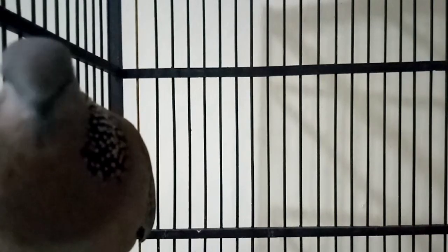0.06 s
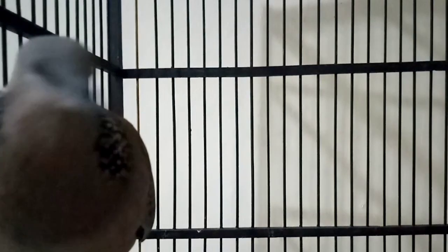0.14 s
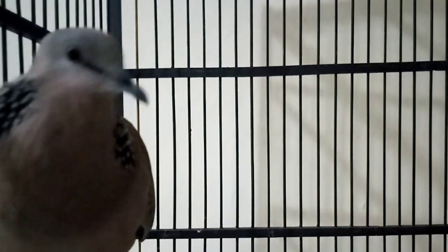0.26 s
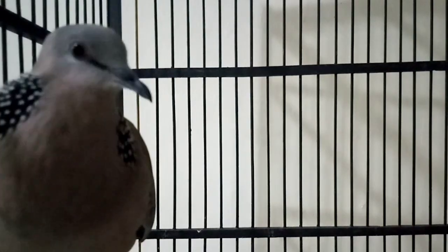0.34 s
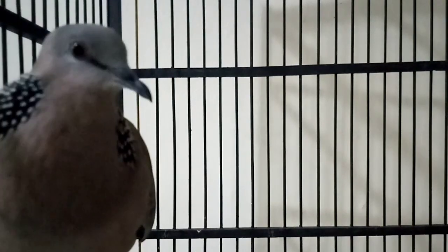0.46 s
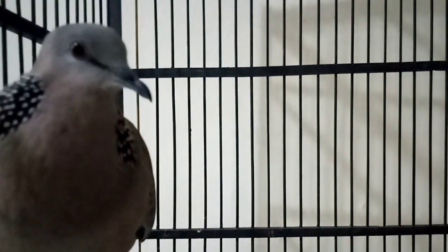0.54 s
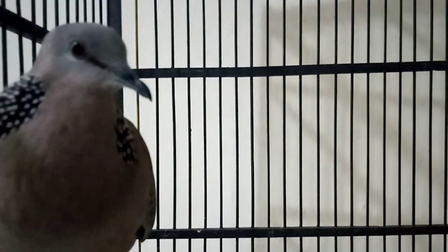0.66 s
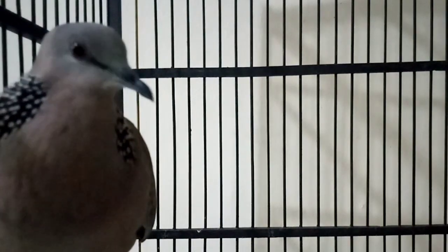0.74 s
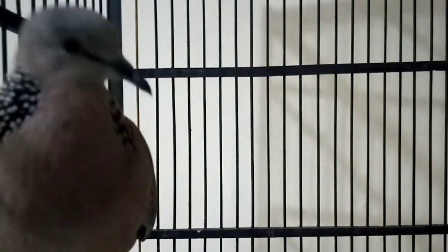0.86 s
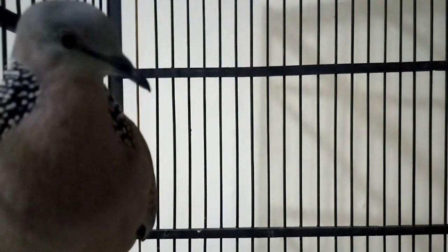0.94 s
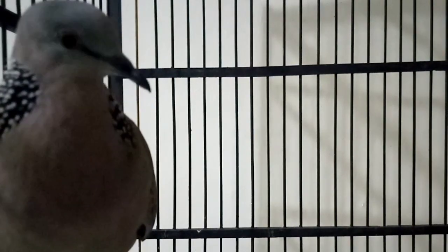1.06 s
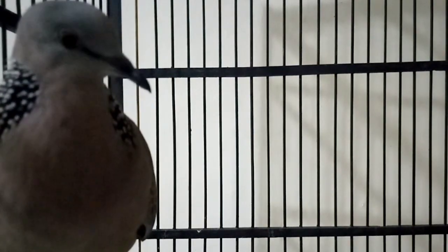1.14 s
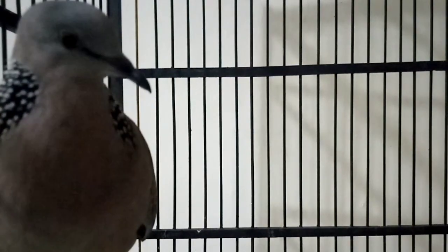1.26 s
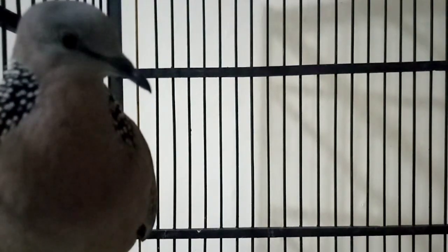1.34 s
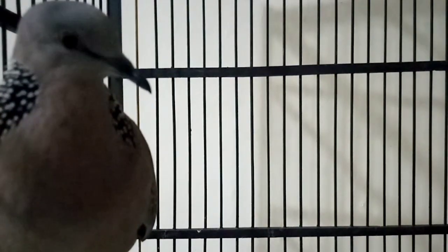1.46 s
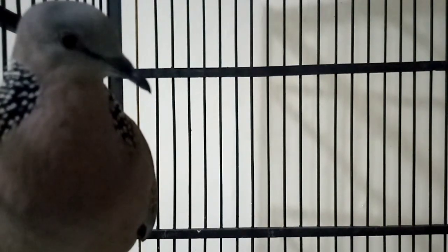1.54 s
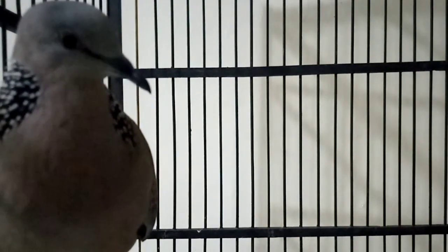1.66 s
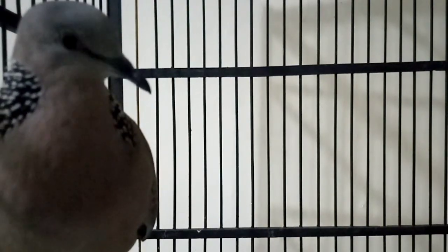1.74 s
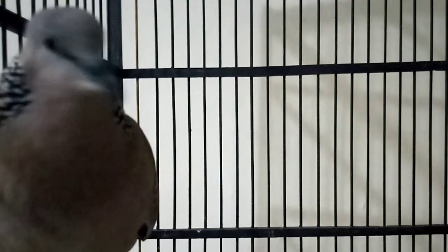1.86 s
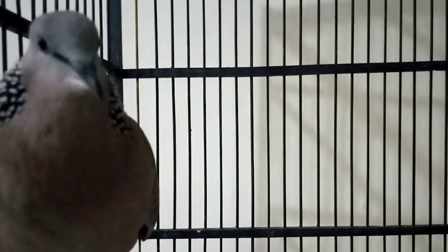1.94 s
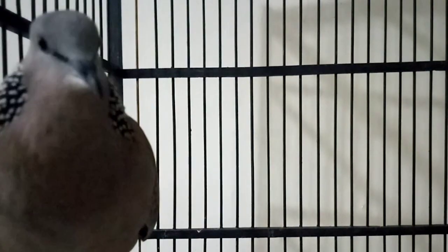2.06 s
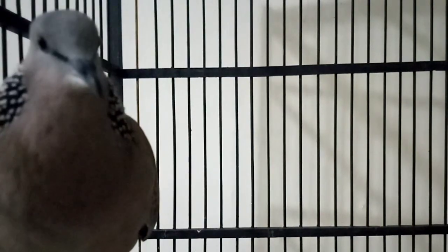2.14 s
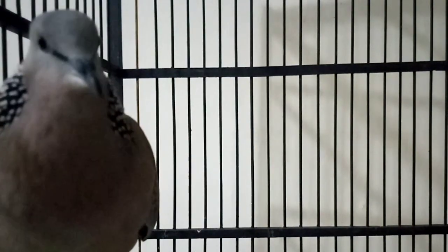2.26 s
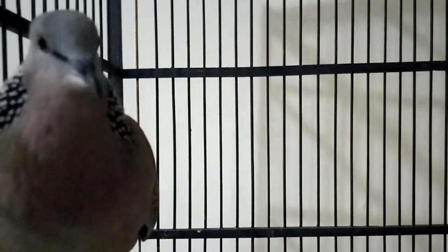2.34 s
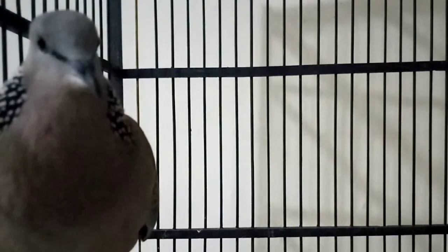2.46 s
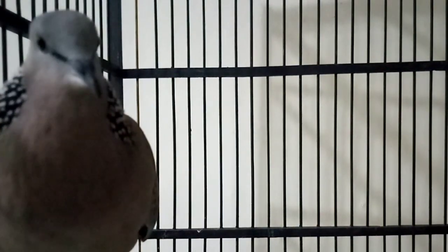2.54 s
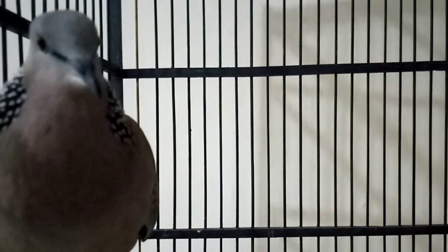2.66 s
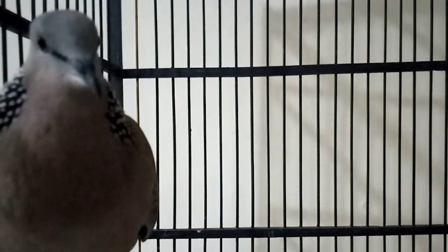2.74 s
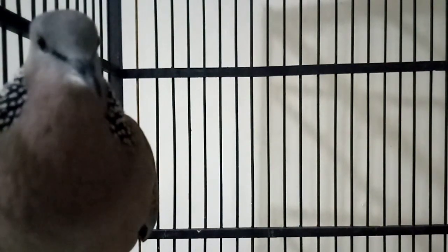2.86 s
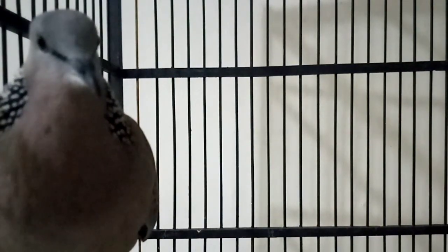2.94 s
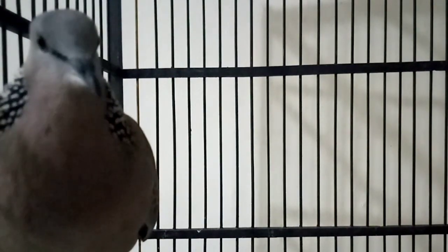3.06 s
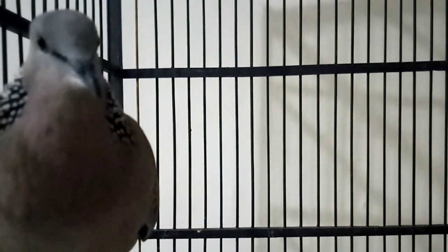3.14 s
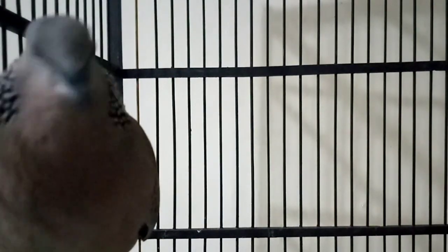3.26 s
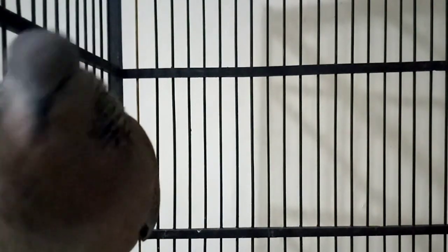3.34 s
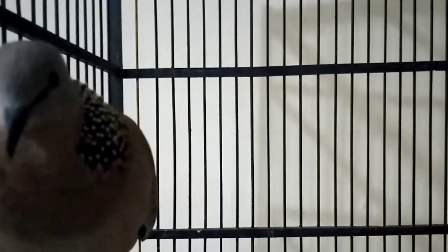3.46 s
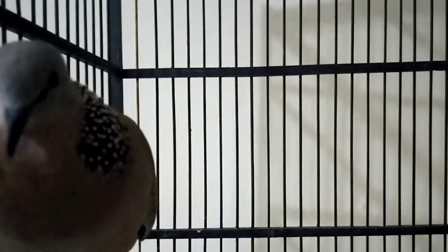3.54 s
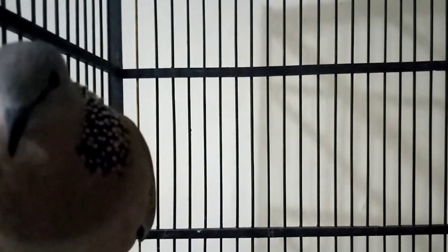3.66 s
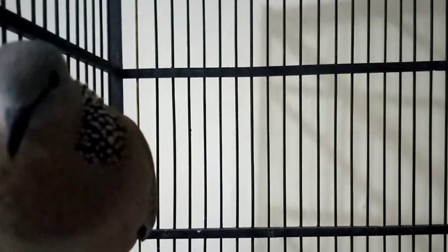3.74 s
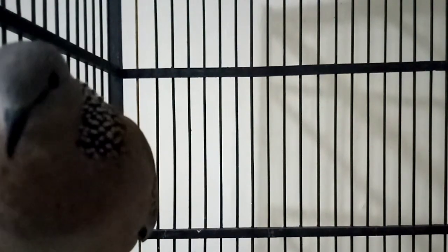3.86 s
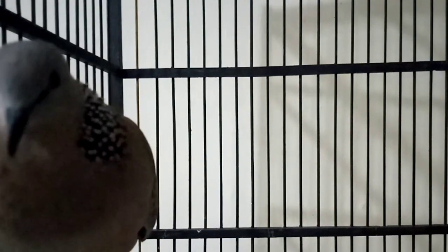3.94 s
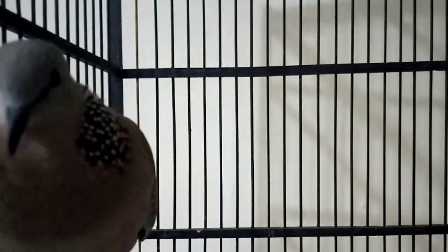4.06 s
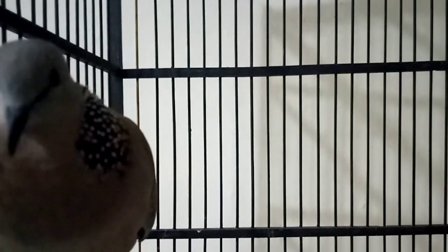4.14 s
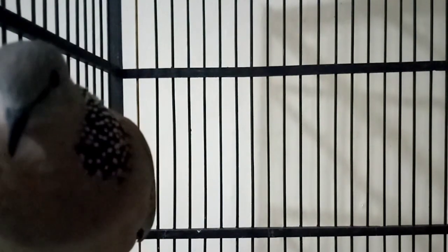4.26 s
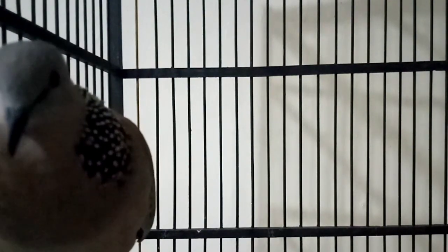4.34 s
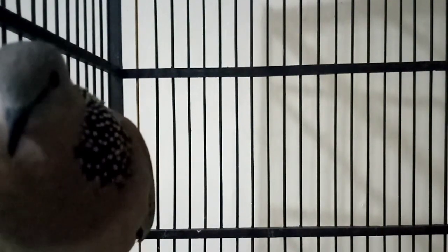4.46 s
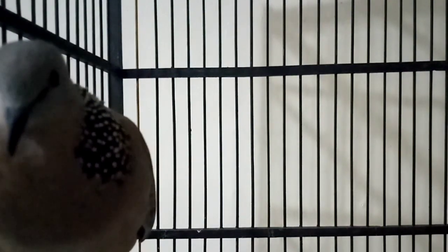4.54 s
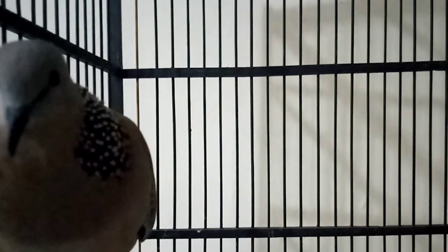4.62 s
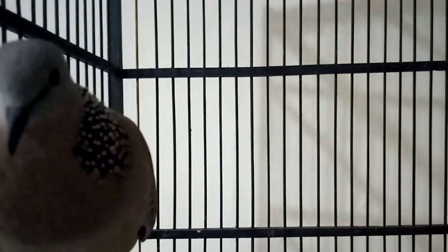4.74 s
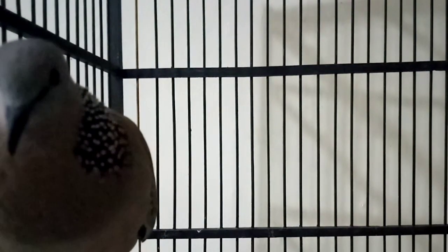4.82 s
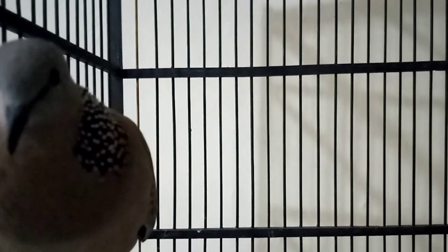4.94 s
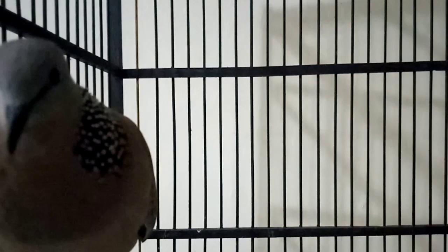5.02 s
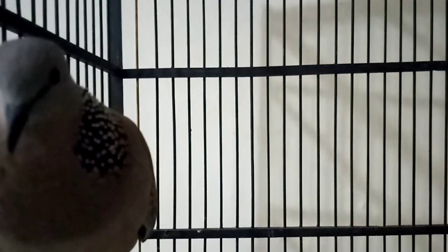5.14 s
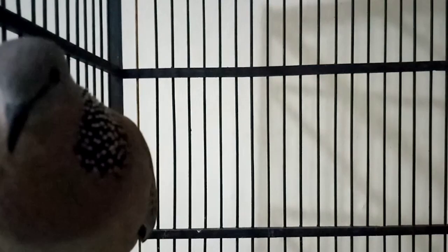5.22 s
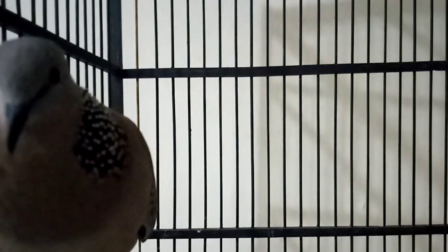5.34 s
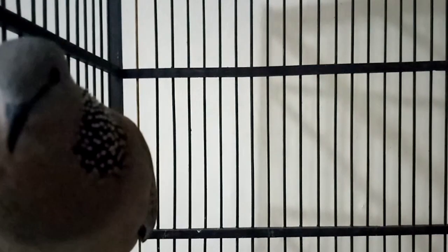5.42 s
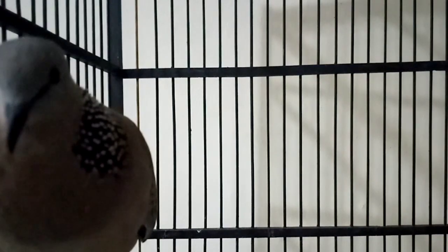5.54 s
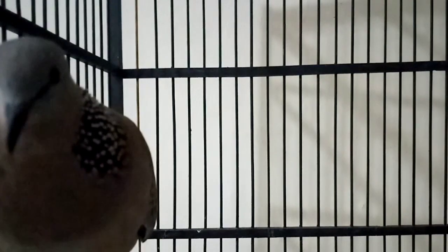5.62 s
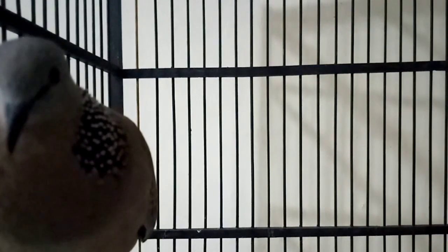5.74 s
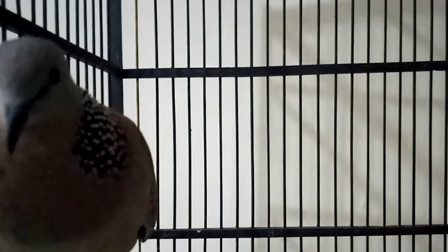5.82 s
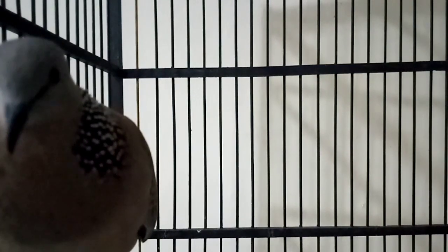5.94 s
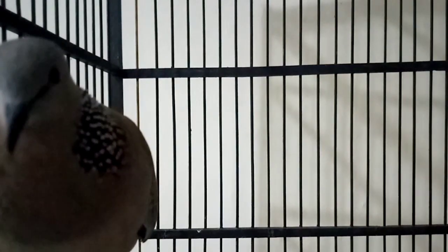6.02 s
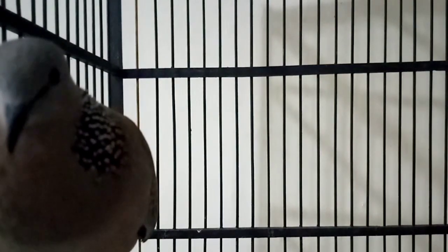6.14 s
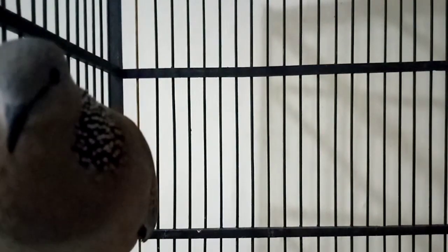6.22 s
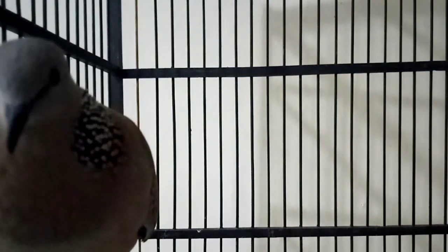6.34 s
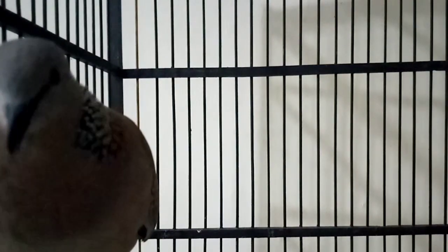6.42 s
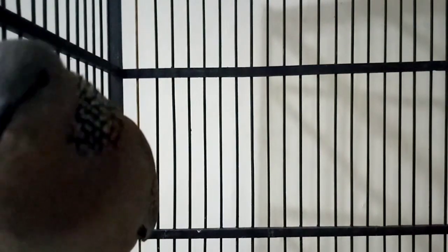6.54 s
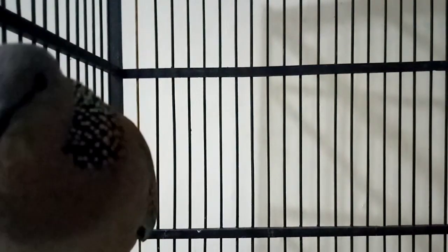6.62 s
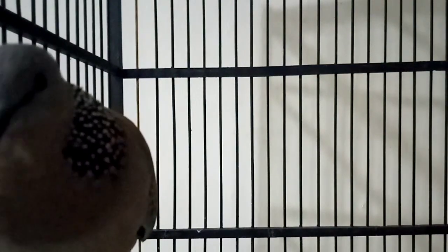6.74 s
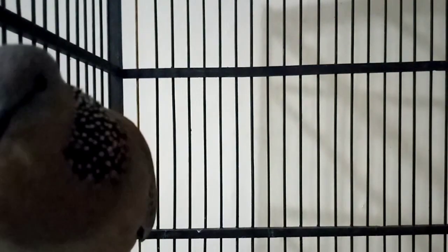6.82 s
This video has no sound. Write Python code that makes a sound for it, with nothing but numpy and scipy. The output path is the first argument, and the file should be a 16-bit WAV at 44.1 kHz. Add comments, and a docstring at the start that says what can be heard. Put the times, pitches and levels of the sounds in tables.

```python
"""A thin high whine trembles over quiet room noise, faint hums and a flickering sizzle, and falters early on.
Far birds call faintly as arching, lightly rolled tones. After soft puffs, a caged spotted dove coos close by:
a short arch, a rising note, then a long rolled note that smooths out as it falls, with faint high ticks.
The coos are near-pure tones with rough octave and buzz; they ring in a small bare room.
A hiss and more far calls follow; at the end the arch, the rise and soft puffs come again."""
import sys
import numpy as np
from scipy import signal
from scipy.fft import rfft, irfft
from scipy.io import wavfile
from scipy.ndimage import uniform_filter1d, minimum_filter1d

SR = 44100
rng = np.random.default_rng(int(sys.argv[2]) if len(sys.argv) > 2 else 0)


def wrap_up_sound(samples):
    """Save the sound to the file named by the first command line argument, as 16-bit audio."""
    columns = np.atleast_2d(samples).T
    # keep every value between -1 and 1, then stretch to whole-number steps
    tamed = np.clip(columns, -1, 1)
    steps = np.round(tamed * 32767).astype(np.int16)
    wavfile.write(sys.argv[1], SR, steps)


N = 303408
TIME_S = np.arange(N) / SR
BINS_HZ = np.fft.rfftfreq(N, 1 / SR)

# background noise spectrum: freq_hz, relative_db_per_hz
FLOOR_SPECTRUM = [(25, -16), (50, -7.5), (100, 1), (135, -3.5), (200, -2), (330, -4), (500, -1), (800, -4),
                  (1400, -16.5), (2600, -17.5), (4200, -20.5), (5100, -25), (6800, -26.5), (7900, -33.5),
                  (15500, -32.5)]
# steady hums: freq_hz, level_db
HUMS = [(101, -72), (286, -73)]
# high sizzle level: time_s, level_db
SIZZLE_LEVEL = [(0, -72), (1.3, -72.5), (1.5, -77), (4.5, -74), (4.95, -69.5), (6.3, -69.5), (6.88, -74)]
# high sizzle spectrum: freq_hz, relative_db_per_hz
SIZZLE_SPECTRUM = [(5300, -31), (6100, -13), (6520, 4), (6800, -8.5), (7050, 2.5), (7250, -7), (7500, -39)]
# slow sway of the whine, of which only the departures from the median are used: time_s, centre_hz
WHINE_SWAY = [(.26, 2314), (.33, 2407), (2.8, 2440), (3.15, 2361), (3.6, 2436), (4.7, 2447), (5.4, 2358),
              (6.1, 2417), (6.88, 2362)]
# narrow noise band around the whine: freq_hz, relative_db_per_hz
WHINE_SKIRT = [(2050, -42), (2200, -19), (2300, -11), (2370, -2.5), (2420, -1), (2470, 0.5), (2550, -13.5),
               (2610, -14), (2700, -40)]
# moments when the whine falters: time_s, half_width_s, change_db
WHINE_DIPS = [(0.26, .04, -9.5), (0.553, 0.061, -2), (1.05, 0.071, -5), (1.5, 0.029, -16)]
# far calls at the source: start_s, length_s, start_pitch_hz, end_pitch_hz, level_db, attack_s
FAR_CALLS = [ (0, 0.4, 576, 560, -64, 0.039), (.76, 0.48, 708, 725, -62.5, 0.35),
             (1.827, 0.2, 792.6, 769.4, -41.5, 0.013), (2.229, .235, 798, 743.5, -43, 0.011),
             (2.925, .125, 705, 670, -54, .06), (5.64, .26, 675, 678, -67, 0.07),
             (5.98, 0.41, 679, 682, -56, 0.23), (6.38, .18, 668, 678, -63.5, .06), ]
# decay of the diffuse room sound: freq_hz, t60_s
ROOM_T60 = [(150, .8), (400, .6), (520, .6), (650, .72), (1000, .7), (1300, .66), (2500, .4), (7000, .25)]
# colour of the diffuse room sound: freq_hz, relative_db
ROOM_COLOUR = [(100, 4.5), (250, 13.5), (400, -7), (550, -9.5), (700, -4.5), (900, -1.5), (1080, 7),
               (1300, 1.5), (2000, -8.5), (7000, -7)]
# the dove's puffs, hisses and rustles: start_s, length_s, centre_hz, width_hz, level_db
HISSES = [(2.976, 0.19, 6040, 800, -66.5), (2.98, 0.16, 2500, 3720, -64.5),
          (3.352, 0.022, 485, 1090, -34.5), (4.73, 0.2, 6380, 803, -59), (6.59, 0.019, 350, 1035, -37.5),
          (6.602, 0.041, 4210, 4250, -56), (6.72, .08, 6280, 455, -60)]
# short notes, one pitch arch each: start_s, rise_s, fall_s, start_hz, top_hz, end_hz, strength_db
SHORT_NOTES = [ (3.364, .038, .085, 404.8, 550.7, 329.8, -1), (3.533, 0.16, 0.022, 370.7, 630, 520, -0.5),
               (6.609, 0.0342, .095, 411, 553, 304.7, -.5), (6.737, 0.19, .029, 332.2, 628.2, 477.9, -0.9),
               ]
# long note: time_s, pitch_hz, strength_db, buzz_db_re_note
LONG_NOTE = [(3.93, 570, 0, -61.5), (3.971, 705, 0, -62.5), (4.052, 724, .5, -59), (4.09, 750, -2.5, -48.5),
             (4.13, 730, 3, -54.5), (4.216, 690, -1.4, -47.5), (4.326, 613, -0.5, -47),
             (4.405, 535, -1, -43), (4.458, 513, 0, -56.5), (4.507, 480, -2.5, -41),
             (4.538, 410, -1, -63.5)]
# octave overtone at its own frequency: freq_hz, level_db
OCTAVE = [(680, -33.5), (780, -25.5), (850, -20.5), (930, -27), (1080, -34), (1260, -34.5), (1420, -33),
          (1540, -34.5)]
# roll strength: time_s, loudness_dip_share (over 1: dies, restarts in a weak afterbeat), pitch_dip_share
ROLL = [(3.942, .55, 0.088), (3.99, 1.085, .18), (4.095, 1.6, .21), (4.16, 0.63, .17), (4.29, .5, 0.1277),
        (4.315, 0.13, 0.0072)]
# roll speed: time_s, rate_hz
ROLL_RATE = [(3.942, 45.5), (4.04, 46.3), (4.1, 52), (4.16, 57), (4.22, 62), (4.29, 68)]
# instants when the voice catches: time_s, half_width_s, loudness_dip_share
CATCHES = [(3.614, .003, .7), (4.198, 0.01236, .5), (4.307, 0.0073, 0.61)]
# loudness the swollen throat gives each pitch: pitch_hz, level_db
THROAT = [(330, -35), (370, -23), (420, -22), (485, -13), (550, -9), (605, -6.5), (680, -2.5), (725, -4),
          (770, -6.5)]
# third harmonic, passed by the throat in a narrow range: freq_hz, level_db_re_note
THIRD_HARMONIC = [(1150, -48.5), (1450, -40), (1650, -39.5), (1900, -41.5), (2050, -46), (2300, -57)]
# colour of the buzzing upper harmonics: freq_hz, relative_db
BUZZ_COLOUR = [(1800, -12), (2300, -6.5), (2800, -2), (3200, -12.5), (3700, -12), (4600, -12.5), (5300, -2),
               (5800, -6), (6450, 3), (7000, -10.5), (7450, -10), (8100, -31.5)]
# near walls: delay_s, gain_db
WALLS = [(.0115, -29.5), (.0205, -20), (.034, -18.5)]
# room modes: freq_hz, gain_db, t60_s
ROOM_MODES = [ (503, 1, 1.2), (748, -5, .85), (915, 8, .8), (590, -11, .7), (627, -13, .55), (672, -8, .75),
              (1172, -1, .65), ]
# high ticks in the long note: time_s, level_db
TICKS = [(3.973, -67.5), (4.114, -59.5), (4.214, -63), (4.313, -48)]

ATTACK_S, RELEASE_S = .008, .0031  # near notes


def amp(db):
    """Decibels to gain."""
    return 10 ** (np.asarray(db) / 20)


def unit(x):
    """Scales to rms 1."""
    return x / np.sqrt(np.mean(x ** 2) + 1e-20)


def read(points, hz):
    """Reads a table on a log-frequency axis."""
    f, value = np.transpose(points)
    return np.interp(np.log(hz + 1), np.log(f + 1), value)


def curves(rows):
    """Each column of a table as a curve over the whole time."""
    s, *columns = np.transpose(rows)
    return [np.interp(TIME_S, s, column) for column in columns]


def sounding(start_s, end_s, attack_s, release_s):
    """Linear attack, hold and release of one note."""
    attack = np.clip((TIME_S - start_s) / attack_s, 0, 1)
    return attack * np.clip((end_s - TIME_S) / release_s, 0, 1)


def bump(centre_s, half_width_s):
    """Bell curve in time, peak 1."""
    return np.exp(-((TIME_S - centre_s) / half_width_s) ** 2)


def noise(gain):
    """Noise of rms 1 with the given gain at each frequency."""
    return unit(irfft(rfft(rng.standard_normal(N)) * gain, N))


def band_noise(points):
    """Noise with a tabled spectrum and nothing outside it."""
    inside = (BINS_HZ > points[0][0]) * (BINS_HZ < points[-1][0])
    return noise(amp(read(points, BINS_HZ)) * inside)


def drift(hz):
    """Random movement of rms 1, rolled off above a rate."""
    return noise(1 / (1 + (BINS_HZ / hz) ** 4))


def angle(hz):
    """Running phase of a frequency curve, in radians."""
    return 2 * np.pi * np.cumsum(hz) / SR


def background(floor_db=-59.5, flicker_db=2, flicker_hz=6, hum_width_hz=3):
    """Shaped room noise, narrow noise hums and a high noise band of flickering level."""
    floor = amp(floor_db) * noise(amp(read(FLOOR_SPECTRUM, BINS_HZ)))
    hums = sum(amp(db) * noise(1 / (1 + ((BINS_HZ - hz) / hum_width_hz) ** 2)) for hz, db in HUMS)
    sizzle_db = curves(SIZZLE_LEVEL)[0] + flicker_db * drift(flicker_hz)
    return floor + hums + amp(sizzle_db) * band_noise(SIZZLE_SPECTRUM)


def whine(near):
    """A wavering high line inside a noise band that sways in pitch; both sink under the loudest coos."""
    level_db, line_db, fuzz_db, flicker_db, sink_db = -57.5, -5, -.5, .86, -12
    line_hz, wander_hz = 2398, 26
    sway_share, waver_share, line_flicker = .7, .002, .21
    centre_hz = curves(WHINE_SWAY)[0] + wander_hz * drift(8)
    shift = np.exp(1j * angle(sway_share * (centre_hz - np.median(centre_hz))))
    fuzz = (signal.hilbert(band_noise(WHINE_SKIRT)) * shift).real
    line = np.sqrt(2) * np.sin(angle(line_hz * (1 + waver_share * drift(8.1))))
    line *= 1 + line_flicker * drift(19)
    coo_power = signal.fftconvolve(near ** 2, np.ones(2400) / 2400)[:N]  # mean of the last 54 ms
    dips_db = sum(db * bump(s, half_width_s) for s, half_width_s, db in WHINE_DIPS)
    level = amp(level_db + dips_db + flicker_db * drift(8.9)) / (1 + coo_power / amp(sink_db) ** 2)
    return level * (amp(line_db) * line + amp(fuzz_db) * fuzz)


def far_bird():
    """Rolled gliding notes, dulled to a bare tone by distance; the faint ones are smoother."""
    beats_hz, beat_depth, beat_scatter = 50, .68, .17
    swing_share, wander_share, arch_hz, release_s = .022, .008, 15, .017
    beats = np.cos(angle(beats_hz * (1 + beat_scatter * drift(6.7))))
    bend = swing_share * beats + wander_share * drift(40)
    out = np.zeros(N)
    for start_s, length_s, start_hz, end_hz, db, attack_s in FAR_CALLS:
        u = np.clip((TIME_S - start_s) / length_s, 0, 1)
        effort = np.clip((db + 61.5) / 15, .1, 1)
        hz = start_hz + (end_hz - start_hz) * u + arch_hz * effort * np.sin(np.pi * u)
        tone = np.sqrt(2) * np.sin(angle(hz * (1 + effort * bend)))
        envelope = sounding(start_s, start_s + length_s, attack_s, release_s)
        out += amp(db) * envelope * (1 + beat_depth * effort * beats) * tone
    return out


def diffuse(x, build_s=.035):
    """Dense echoes as decaying noise: they build up, then die at a rate set for each frequency."""
    hz, t, z = signal.stft(rng.standard_normal(SR), SR, nperseg=256)
    z = z * amp(-60 * t / np.maximum(read(ROOM_T60, hz), .05)[:, None])
    z = z * (1 - np.exp(-(t / build_s) ** 2)) * amp(read(ROOM_COLOUR, hz))[:, None]
    tail = signal.istft(z, SR, nperseg=256)[1]
    in_voice = (BINS_HZ > 450) & (BINS_HZ < 800)
    tail /= np.sqrt(np.mean(abs(rfft(tail, N)[in_voice]) ** 2))  # rms gain 1 in the voice band
    return signal.fftconvolve(x, tail)[:N]


def hisses():
    """Short puffs of band noise that swell and fade almost evenly."""
    out = np.zeros(N)
    for start_s, length_s, hz, width_hz, db in HISSES:
        u = np.clip((TIME_S - start_s) / length_s, 0, 1)
        band = 1 / (1 + (2 * (BINS_HZ - hz) / width_hz) ** 4)
        out += amp(db) * np.sin(np.pi * u ** .91) * noise(band)
    return out


def phrases():
    """All the dove's notes as curves of pitch, strength, buzz and octave overtone."""
    rise_curve, fall_curve = 1.9, 1.55  # roundness of the arch, 1 = straight
    pressed_buzz_db, pressed_hz, buzz_db_per_hz = -46, 627, .17  # short notes buzz more when higher
    long_octave_db = -4  # the long note is purer
    hz, long_db, buzz_db = curves(LONG_NOTE)
    on = amp(long_db) * sounding(LONG_NOTE[0][0], LONG_NOTE[-1][0], ATTACK_S, RELEASE_S)
    purity_db = long_octave_db * (on > 0)
    for start_s, rise_s, fall_s, start_hz, top_hz, end_hz, db in SHORT_NOTES:
        top_s = start_s + rise_s
        note = sounding(start_s, top_s + fall_s, ATTACK_S, RELEASE_S)
        before = np.clip((top_s - TIME_S) / rise_s, 0, 1)
        after = np.clip((TIME_S - top_s) / fall_s, 0, 1)
        arch_hz = top_hz - (top_hz - start_hz) * before ** rise_curve
        arch_hz -= (top_hz - end_hz) * after ** fall_curve
        hz = np.where(note > 0, arch_hz, hz)
        buzz_db = np.where(note > 0, pressed_buzz_db + buzz_db_per_hz * (arch_hz - pressed_hz), buzz_db)
        on = on + amp(db) * note
    return hz, on, buzz_db, read(OCTAVE, 2 * hz) + purity_db


def roll():
    """The voice opens and shuts, and pitch arches with every beat: factors on loudness and pitch."""
    lag_rad, squareness, narrow = .5, 2.2, .2
    unevenness, pitch_scatter, catch_sag_share = .39, .07, .081
    rolling = (TIME_S > LONG_NOTE[0][0]) * (TIME_S < LONG_NOTE[-1][0])
    depth, swing = (np.clip(c, 0, 2) * rolling for c in curves(ROLL))
    beat = angle(curves(ROLL_RATE)[0])
    beat -= np.interp(ROLL_RATE[0][0], TIME_S, beat)  # starts open
    shut = .5 - .5 * np.tanh(squareness * (np.cos(beat) - narrow)) / np.tanh(squareness)
    loud = (1 - depth * shut) * (1 + unevenness * depth * drift(47))
    bend = 1 - swing * (.5 - .5 * np.cos(beat - lag_rad) + pitch_scatter * drift(120))
    for s, half_width_s, dip in CATCHES:
        catch = bump(s, half_width_s)
        loud = loud * (1 - dip * catch)
        bend = bend * (1 - catch_sag_share * catch)
    return loud, bend


def coo(pitch_hz, on, buzz_db, octave_db, throb, bend):
    """A nearly pure tone from the swollen throat, with weak rough overtones and a faint buzz when pressed."""
    jitter, octave_rasp, buzz_rasp, shimmer_depth = .00091, .4, .35, .045
    even_db, buzz_bend, crest = -7, .2, .8
    echo_s, echo_gain = .0021, .71
    live = on > 0
    level_db = read(THROAT, pitch_hz[live])
    hz = (pitch_hz * bend * (1 + jitter * drift(90)))[live]
    phase = angle(hz)
    octave = np.sin(2 * phase + octave_rasp * drift(130)[live]) * (1 + octave_rasp * drift(190)[live])
    tone = np.sin(phase) + amp(read(THIRD_HARMONIC, 3 * hz)) * np.sin(3 * phase)
    # the buzz follows the roll's bends only in part
    buzz_hz = (pitch_hz * bend ** buzz_bend)[live]
    buzz_phase = angle(buzz_hz * (1 + jitter * drift(90)[live]))
    buzz = 0
    for k in range(4, 19):
        # near-symmetric vibration: odd harmonics stand out
        harmonic_db = read(BUZZ_COLOUR, k * buzz_hz) + even_db * (k % 2 == 0)
        buzz = buzz + amp(harmonic_db) * np.sin(k * buzz_phase)
    buzz *= np.clip(throb[live], 1e-3, 1) ** crest  # beat crests buzz most
    # a close reflection makes gliding overtones come and go
    buzz += echo_gain * np.interp(TIME_S[live] - echo_s, TIME_S[live], buzz, left=0)
    tone += amp(buzz_db[live]) * buzz * (1 + buzz_rasp * drift(150)[live])
    out = np.zeros(N)
    # the rough octave carries on between the beats of the roll
    out[live] = np.sqrt(2) * amp(level_db) * tone * throb[live] + amp(octave_db[live]) * octave
    return out * on * (1 + shimmer_depth * drift(110))


def dove(low_noise_db=-42.5, low_noise_hz=380, follow=.52, air_db=-58, air_hz=2000):
    """The coos, with low noise and a little hiss that follow their strength."""
    voice = coo(*phrases(), *roll())
    strength = np.sqrt(abs(uniform_filter1d(voice ** 2, size=400)))
    low_noise = amp(low_noise_db) * noise(1 / np.hypot(1, BINS_HZ / low_noise_hz) ** 2)
    air = amp(air_db) * noise(1 / np.hypot(1, BINS_HZ / air_hz) ** 2)
    return voice + strength ** follow * low_noise + strength * air


def room(x, wet_db=-14):
    """Direct sound, near-wall delays, ringing modes as complex one-pole resonators, and the diffuse tail."""
    out = x + amp(wet_db) * diffuse(x)
    for delay_s, db in WALLS:
        out += amp(db) * np.interp(TIME_S - delay_s, TIME_S, x, left=0)
    for hz, db, t60_s in ROOM_MODES:
        r = np.exp(-np.log(1000) / (t60_s * SR))
        pole = r * np.exp(2j * np.pi * hz / SR)
        out += 2 * amp(db) * signal.lfilter([1 - r], [1, -pole], x + 1e-15).imag
    return out


def ticks(centre_hz=12000, width_hz=3200, decay_s=.001):
    """Tiny bright noise clicks that die at once."""
    envelope = sum(amp(db) * (TIME_S >= s) * np.exp(-abs(TIME_S - s) / decay_s) for s, db in TICKS)
    return envelope * noise(1 / (1 + (2 * (BINS_HZ - centre_hz) / width_hz) ** 4))


def suppress(x, threshold_db=-54, knee_db=3, depth_db=-6.5):
    """A noise suppressor turns the midrange down when it is quiet, which cuts tails short."""
    band = signal.butter(4, [370, 1130], "bandpass", fs=SR, output="sos")
    mid = signal.sosfiltfilt(band, x)
    power_db = 10 * np.log10(abs(uniform_filter1d(mid ** 2, size=1800)) + 1e-12)
    closed = .5 - .5 * np.tanh((power_db - threshold_db) / knee_db)
    return x + mid * (amp(depth_db * closed) - 1)


def limit(x, ceiling=.87):
    """A smooth limiter holds the loudest beats just under full scale."""
    headroom = np.minimum(1, ceiling / (abs(x) + 1e-9))
    gain = minimum_filter1d(headroom, size=600)
    return x * uniform_filter1d(uniform_filter1d(gain, size=300), size=300)


def scene(far_direct_db=-2, far_wet_db=-11):
    """The steady sounds, the far birds and the near dove in its room."""
    near = room(dove())
    far = far_bird()
    far = amp(far_direct_db) * far + amp(far_wet_db) * diffuse(far)
    return (background() + whine(near) + far + hisses() + near + ticks())[None]


def record(dry, edge_hz=15600):
    """Noise suppressor, limiter and low-pass band limit."""
    band_limit = signal.firwin(511, edge_hz, window=("kaiser", 9), fs=SR)
    return signal.oaconvolve(limit(suppress(dry[0])), band_limit, "same")[None]


dry = scene()
out = record(dry)
wrap_up_sound(out)
```